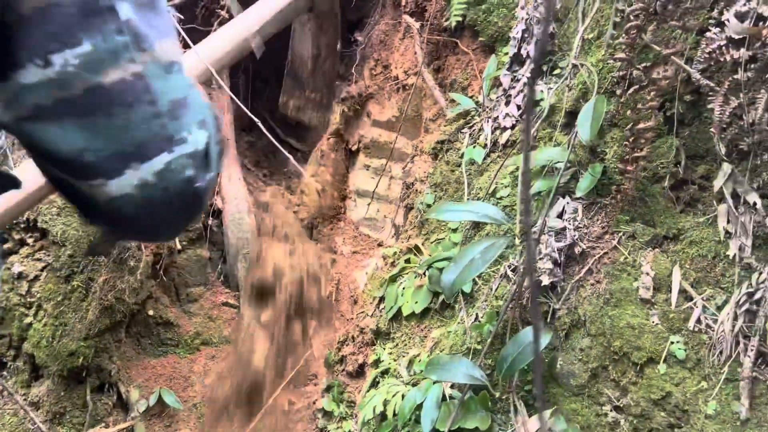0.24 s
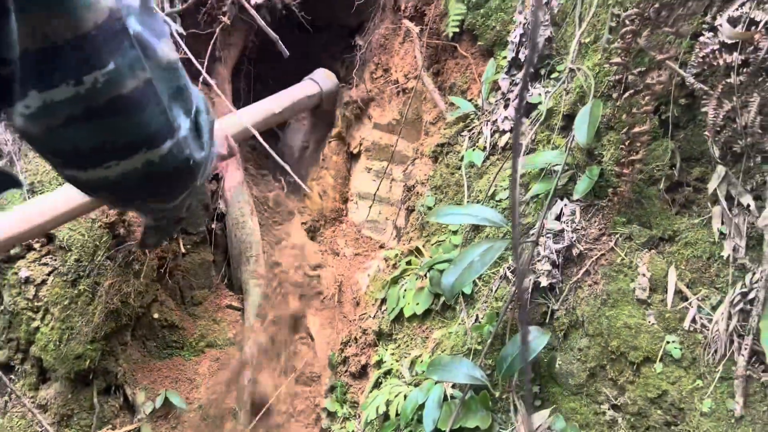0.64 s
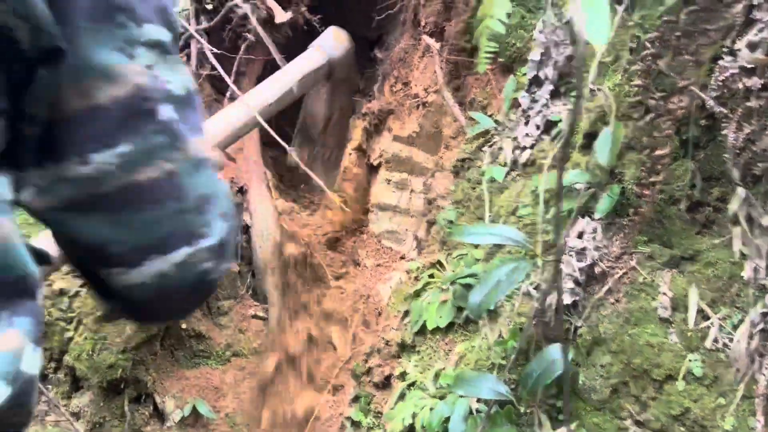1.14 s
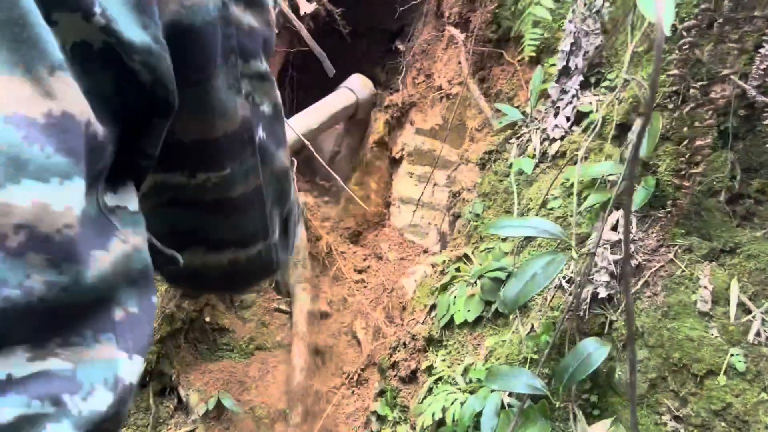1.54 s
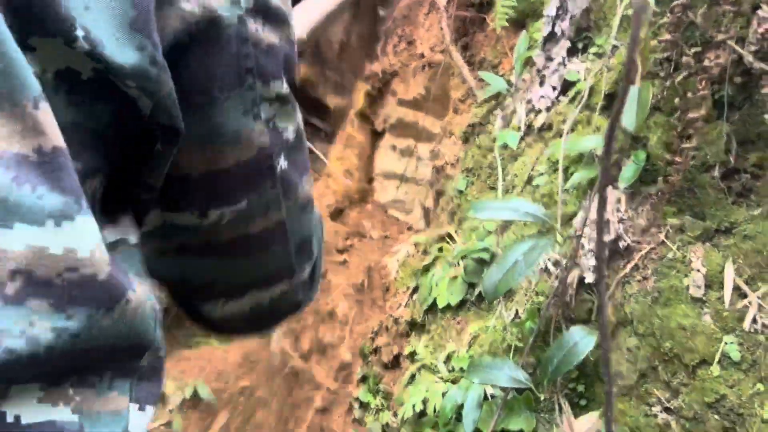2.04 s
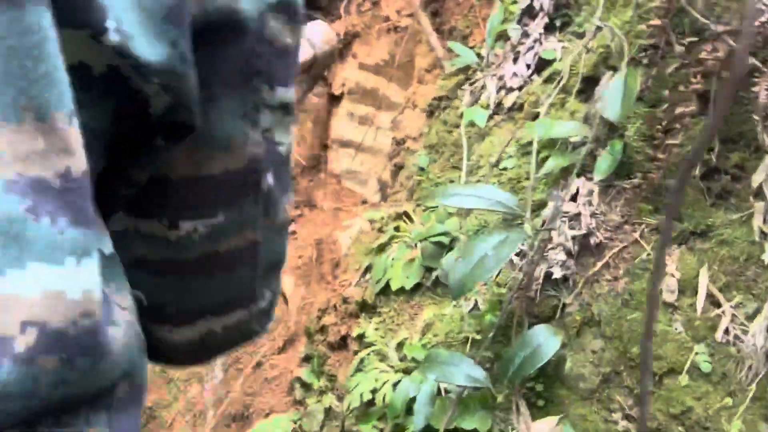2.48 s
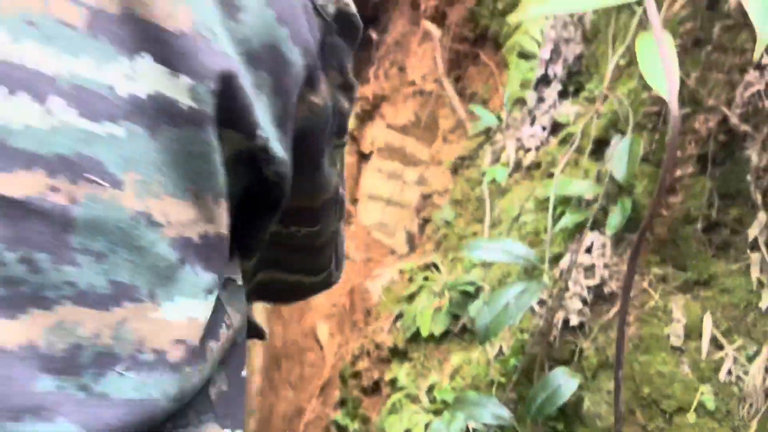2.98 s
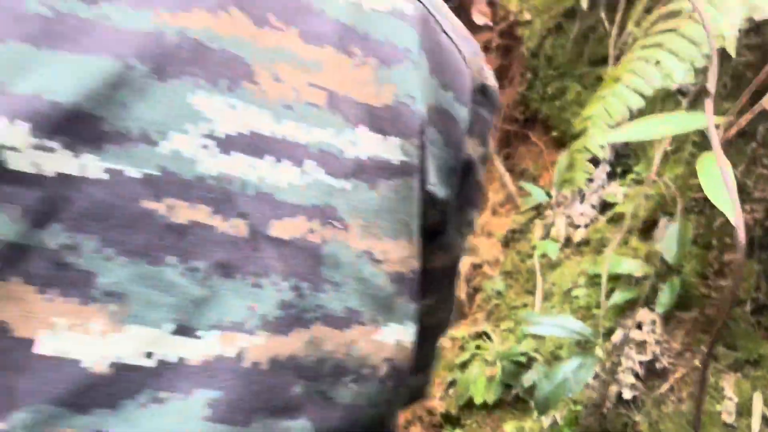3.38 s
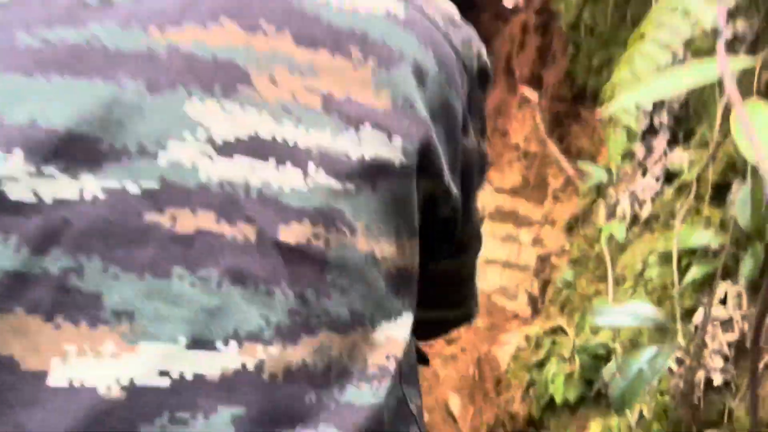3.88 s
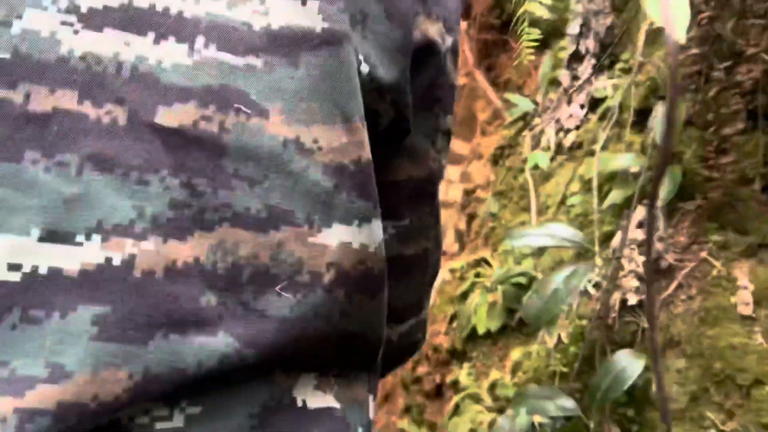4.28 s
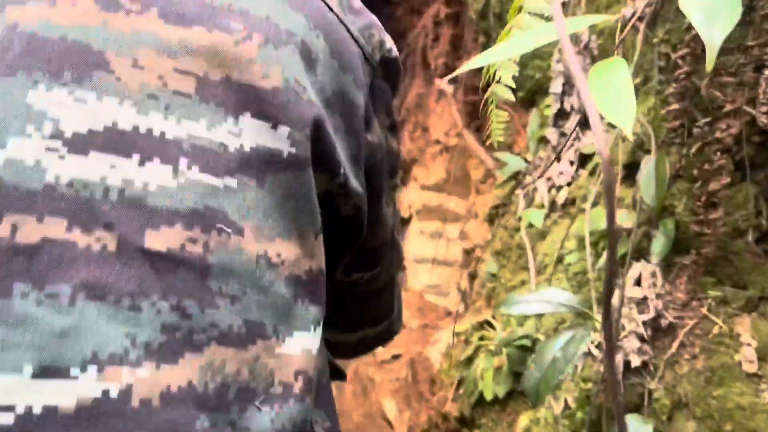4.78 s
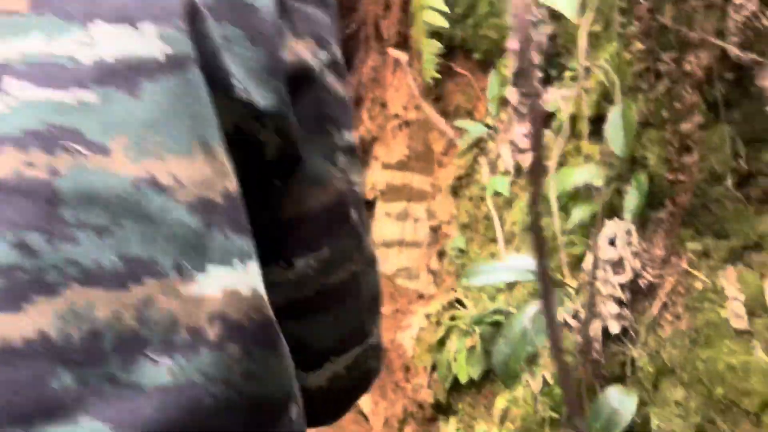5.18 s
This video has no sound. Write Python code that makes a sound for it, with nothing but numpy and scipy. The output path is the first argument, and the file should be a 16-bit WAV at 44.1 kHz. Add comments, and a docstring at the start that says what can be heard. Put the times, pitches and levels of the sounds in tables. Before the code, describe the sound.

A hoe thuds repeatedly into packed hillside soil close by, with gritty blade scrapes, clods knocking down and loose earth trickling after each blow.

```python
"""A sleeve brushes as the arms swing and earth already spills: cloth friction is two layers of grain noise.
Then a hoe chops into a bank of packed earth outdoors, close by: crushed grains, a crack that rings the
blade's modes, and a slap and heave made by sines that fall in pitch. The blade is dragged free with a
gritty rasp and squeaks; clods land as short ringing knocks, crumbs and sand run after them as random grains."""
import sys
import numpy as np
from scipy import signal
from scipy.fft import rfft, irfft
from scipy.io import wavfile

SR = 44100
rng = np.random.default_rng(int(sys.argv[2]) if len(sys.argv) > 2 else 0)


def unload_audio(sound):
    """Save the sound as a 16-bit wav file, at the path given as the first command line argument."""
    columns = np.transpose(np.atleast_2d(sound))
    # keep every value between -1 and 1, then stretch to whole-number steps
    steps = np.round(np.clip(columns, -1, 1) * 32767)
    wavfile.write(sys.argv[1], SR, steps.astype(np.int16))


N = 239188
TIME = np.arange(N) / SR
FREQS = np.fft.rfftfreq(N, 1 / SR)
TINY = 1e-18  # keeps recursive filters out of denormal numbers


def from_db(db):
    """Decibels to gain."""
    return 10 ** (np.asarray(db) / 20)


def rms_one(x):
    """Scale to unit rms."""
    return x / np.sqrt(np.mean(x ** 2) + 1e-20)


def over_hz(points):
    """Read a table on a log-frequency axis."""
    hz, value = np.transpose(points)
    return np.interp(np.log(FREQS + 1), np.log(hz), value)


def coloured(x, spectrum):
    """Give a signal a smooth spectrum."""
    return irfft(rfft(x) * from_db(over_hz(spectrum)), N)


# Likeness of the two channels. Each row: frequency in Hz, correlation [0-1].
LIKENESS = [(60, 1), (140, 0.93), (300, 0.87), (550, 0.49), (800, 0.08), (1400, 0.046), (1900, 0.73),
            (3300, 0.81), (5000, 0.17), (6500, 1), (10000, 1), (12000, 0.94)]


def stereo_noise(spectrum, sizes=1):
    """Random pushes of the given sizes, coloured and partly alike in both channels; rms 1."""
    mid, side = rfft(sizes * rng.standard_normal((2, N)))
    alike = np.clip(over_hz(LIKENESS), 0, 1)
    common = np.sqrt(1 + alike) * mid
    difference = np.sqrt(1 - alike) * side * [[1], [-1]]
    return rms_one(irfft((common + difference) * from_db(over_hz(spectrum)), N))


def grit(spectrum, per_s, spread_db):
    """Grains collide at random moments: many small ones, a few large."""
    born = rng.random(N) < per_s / SR
    sizes = from_db(spread_db * np.minimum(rng.exponential(1, N), 4))
    return stereo_noise(spectrum, born * sizes)


def swell(s, rise, fall, hold=0):
    """A contact builds up to its peak at time s, holds and dies away exponentially."""
    before = (s - TIME) / rise
    after = (TIME - s - hold) / fall
    return np.exp(-np.clip(np.maximum(before, after), 0, 20))


def unevenness(depth_db, hz):
    """A gain that wavers below the given rate, as when earth gives way in fits."""
    slow = signal.sosfilt(signal.butter(2, hz, fs=SR, output="sos"), rng.standard_normal(N))
    return from_db(depth_db * rms_one(slow))


def resonance(x, hz, q):
    """Pass what lies round one pitch."""
    return signal.lfilter(*signal.iirpeak(hz, q, fs=SR), x + TINY)


BITE_Q, BITE_SHARE = 2.57, 0.52  # how narrowly and how strongly a contact favours its own pitch


def bite(force, hz, share=BITE_SHARE):
    """A contact pushes hardest round one pitch, set by the size and hardness of what is hit."""
    return (1 - share) * force + 2 * share * resonance(force, hz, BITE_Q)


def add(track, s, piece):
    """Lay a short sound into a track at time s."""
    start = int(np.clip(round(s * SR), 0, N))
    track[start:start + len(piece)] += piece[:N - start]


def soil_wave(s, first_hz, last_hz, glide, depth_s, fall, growth):
    """Yielding soil pushes the air: quick ripples come first, the slow heave last."""
    t = np.arange(SR // 5) / SR
    hz = last_hz + (first_hz - last_hz) * np.exp(-(t / glide) ** 2)
    level = np.minimum((t / depth_s) ** growth, np.exp((depth_s - t) / fall))
    wave = level * np.sin(2 * np.pi * np.cumsum(hz) / SR)
    return np.concatenate([np.zeros(round(s * SR)), wave, np.zeros(N)])[:N]


# Spectrum of the open air. Each row: frequency in Hz, density in dB per Hz.
AIR = [(20, -21), (60, 16.5), (200, -13), (600, 8), (2000, -55), (6000, -19), (12000, -11.5), (15000, -14)]
AIR_DB = -72.5


def air():
    """Still open air: a faint steady noise."""
    return from_db(AIR_DB) * stereo_noise(AIR)


# Dull bumps. Each row: start in seconds, level in dB, final pitch in Hz.
BUMPS = [(.003, -48.5, 81.3), (0.587, -50, 72), (0.786, -31, 32), (1.764, -40.5, 73), (2.94, -52, 90),
         (4.545, -46, 72.5)]


def bumps():
    """Dull bumps pass through the ground, each falling in pitch."""
    return sum(from_db(db) * soil_wave(s, 1.8 * hz, hz, glide=0.0095, depth_s=0.0069, fall=0.022, growth=0.9)
               for s, db, hz in BUMPS)


# Arm swings. Each row: time of the height in seconds, hiss in dB, flutter in dB,
# time to swell in seconds, time to fade in seconds.
SWINGS = [(.02, -55, -51.5, 0.02, 0.042), (.74, -53, -55.5, 0.14, 0.079), (1.6, -61, -100, 0.19, 0.16),
          (2.0, -63.5, -59, 0.093, 0.016), (2.3, -60, -61.5, 0.62, 1), (3.27, -60.5, -52, 0.055, 0.24),
          (4.1, -103, -50.5, 0.086, 0.18), (4.818, -69.5, -51, 0.23, 0.42)]
# Flutter of the cloth. Each row: frequency in Hz, density in dB per Hz.
CLOTH = [(60, 14.5), (150, -0.5), (310, 8), (500, 2.5), (1400, 2.5), (2300, -8.5), (5300, -7), (8000, -23)]
# Sandy hiss, of cloth and of running sand. Each row: frequency in Hz, density in dB per Hz.
SAND = [(1000, 1.5), (2200, 2), (3200, 2.5), (4300, 1.5), (5500, -1), (7000, -4), (9800, -8), (12000, -7),
        (14000, -15), (16000, -15)]


def sleeve():
    """Cloth brushes on cloth with each swing: a sandy hiss over a dull flutter."""
    hiss, flutter = np.zeros((2, N))
    for s, hiss_db, flutter_db, rise, fall in SWINGS:
        rub = swell(s, rise, fall)
        hiss += from_db(hiss_db) * rub
        flutter += from_db(flutter_db) * rub
    hiss_noise = unevenness(depth_db=2.0, hz=30.2) * grit(SAND, per_s=7000, spread_db=3.0)
    return hiss * hiss_noise + flutter * grit(CLOTH, per_s=2700, spread_db=0.5)


# Small stones and twigs snapping. Each row: start in seconds, level in dB, favoured pitch in Hz.
TICKS = [(0.0771, -27.5, 1420), (0.1242, -43, 1600), (0.1623, -30.5, 3380), (0.3655, -51, 5000),
         (0.7935, -25, 1700), (0.9275, -47, 2500), (0.9727, -29.5, 2700), (1.185, -38, 2600),
         (1.731, -38, 2300), (1.7436, -34.5, 1200), (1.811, -32.5, 1900), (1.837, -35, 1600),
         (1.981, -38, 2000), (2.596, -26.5, 2970), (2.612, -35, 3000), (2.6233, -40, 2500),
         (2.6625, -33, 2500), (2.692, -47, 1200), (2.7345, -34.5, 2110), (2.84, -39, 2920), (3, -46, 1500),
         (3.062, -43.5, 1930), (3.118, -43.5, 1800), (3.39, -36, 1800), (3.409, -29.5, 10100),
         (3.4245, -26.5, 10000), (3.449, -37, 2000), (3.53, -39, 1800), (4.0103, -42, 5960),
         (4.305, -42, 1750), (4.3225, -42, 1750), (4.365, -38, 1700), (4.605, -36.5, 2970),
         (5.195, -30, 3500)]
# Spectrum of a snap. Each row: frequency in Hz, density in dB per Hz.
SNAP = [(400, 17), (1500, 14), (3500, 4.5), (6500, 3), (11000, -5), (15000, -21)]
TICK_RISE_S, TICK_FALL_S = 0.000093, 0.0029


def ticks():
    """Short dry cracks of stones and twigs, each with a colour of its own."""
    snap = stereo_noise(SNAP)
    out = 0
    for s, db, hz in TICKS:
        burst = snap * swell(s + TICK_RISE_S, TICK_RISE_S, TICK_FALL_S)
        out = out + from_db(db) * bite(burst, hz, share=0.65)
    return out


# Modes of the steel blade. Each row: frequency in Hz, width in Hz, level in dB;
# the caller's pitch and damping factors scale frequency and width.
BLADE = [(880, 160, -14.5), (1190, 52, 3.5), (1493, 59, -0.5), (1698, 32, -3.5), (2014, 58, -4),
         (2800, 61, 0.5), (3276, 123, -4), (3910, 110, -10), (4430, 36, -6), (4820, 34, -0.5),
         (5270, 130, -29), (6166, 38, 4), (6840, 110, -3.5), (9770, 94, -2), (11730, 77, -17)]


def blade(force, damping=1, pitch=1):
    """The blade rings in its modes; soil around it damps them."""
    out = 0
    for k, (hz, width_hz, db) in enumerate(BLADE):
        r = np.exp(-np.pi * damping * width_hz / SR)
        poles = [1, -2 * r * np.cos(2 * np.pi * pitch * hz / SR), r * r]
        mode = signal.lfilter([1, 0, -1], poles, force + TINY)
        out = out + (-1) ** k * from_db(db) * (1 - r * r) / 2 * mode
    return out


# Loosened earth spilling down the slope. Each row: time of the height in seconds, ground rumble in dB,
# crumbs in dB, sand in dB, run-out time of the crumbs in seconds.
SPILLS = [(0.142, -70, -51.5, -59, 0.11), (.24, -54.5, -64, -63.5, 0.074), (0.929, -61, -51, -55, 0.16),
          (1.79, -54.5, -48.5, -56, 0.1), (2.614, -63, -46, -54.5, 0.086), (2.91, -55.5, -57, -87, 0.19),
          (3.441, -49.5, -46, -58, 0.11), (3.92, -52.5, -61.5, -70, 0.043),
          (4.253, -43.5, -44.5, -52, 0.077), (4.367, -39.5, -45.5, -81, 0.024),
          (4.478, -42, -57, -63, 0.046), (5.23, -54, -47, -56, 0.059), (5.38, -55, -49, -59, 0.099)]
SPILL_RISE_S = 0.065
RUMBLE_REST_DB, CRUMBS_REST_DB, SAND_REST_DB = -69.5, -78.5, -86  # the slope never quite settles
RUMBLE_LINGERS, SAND_LINGERS = 1.26, 0.97  # run-out time relative to the crumbs


def spill_flow():
    """Each spill gathers and runs out: strengths of its rumble, crumbs and sand, summed as power."""
    rest = from_db([RUMBLE_REST_DB, CRUMBS_REST_DB, SAND_REST_DB])
    power = np.outer(rest ** 2, np.ones(N))
    for s, *levels_db, fall in SPILLS:
        for k, lingers in enumerate((RUMBLE_LINGERS, 1, SAND_LINGERS)):
            power[k] += (from_db(levels_db[k]) * swell(s, SPILL_RISE_S, lingers * fall)) ** 2
    return np.sqrt(power)


def pebbles(level, low_hz, high_hz, per_s, cycles, count=28):
    """Hard crumbs bounce at random, each ringing briefly at a pitch picked at random."""
    born = rng.random(N) < per_s / SR
    sizes = from_db(1.4 * np.minimum(rng.exponential(1, N), 3))
    hits = born * sizes * rng.choice([-1, 1], N)
    dealt = rng.integers(0, count, N)
    out = 0
    for k, hz in enumerate(np.geomspace(low_hz, high_hz, count)):
        r = from_db(-60 * hz / (cycles * SR))  # down 60 dB after the given cycles
        w = 2 * np.pi * hz / SR
        ping = signal.lfilter([0, np.sin(w)], [1, -2 * r * np.cos(w), r * r], hits * (dealt == k) + TINY)
        out = out + ping * from_db(rng.normal(0, 1.0, (2, 1)))
    return level * rms_one(out)


# Rumble of the ground. Each row: frequency in Hz, density in dB per Hz.
RUMBLE = [(20, -28), (45, 4.5), (80, 5.5), (150, 2), (260, -9.5), (500, -19.5), (1200, -66)]
# Patter of crumbs. Each row: frequency in Hz, density in dB per Hz.
CRUMBS = [(120, 22), (300, 19.5), (550, 15.5), (900, -4), (1400, 11.5), (2000, 10), (3000, -18),
          (6000, -64)]


def sliding_earth(rumble, crumbs, sand):
    """Crumbs patter and sand hisses down the slope and over the blade, in small clusters."""
    fits = unevenness(depth_db=2.8, hz=90)
    ground = rumble * grit(RUMBLE, per_s=360, spread_db=3.5)
    patter = crumbs * grit(CRUMBS, per_s=1100, spread_db=3.0)
    patter = patter + pebbles(from_db(-3.5) * crumbs, 378, 2830, per_s=700, cycles=12.0)
    trickle = from_db(1.5) * sand * grit(SAND, per_s=3000, spread_db=1.5)
    ring = from_db(13) * blade(sand * stereo_noise(SAND))
    return ground + fits * (patter + trickle + ring)


# Coarse grit, dragged or bouncing. Each row: frequency in Hz, density in dB per Hz.
COARSE = [(200, 5), (600, -1), (1000, -2), (1400, -1), (2050, -3.5), (2700, -8.5), (4500, -16), (7000, -45),
          (15000, -37)]
CHIPS_PER_S, CHIP_FALL_S = 65, 0.0043
CHIP_DB = 7.5  # gain over the crumbs' strength
CHIP_SPREAD_DB = 14  # between the largest and the smallest


def chips(flow):
    """Hard chips bounce at random in a spill, each a short gritty click at one of three pitches."""
    out = 0
    for hz in np.geomspace(1100, 4200, 3):
        born = rng.random(N) < CHIPS_PER_S / (3 * SR)
        hits = born * from_db(-CHIP_SPREAD_DB * rng.random(N))
        clicks = signal.lfilter([1], [1, -np.exp(-1 / (CHIP_FALL_S * SR))], hits + TINY)
        out = out + bite(clicks * stereo_noise(COARSE), hz)
    return from_db(CHIP_DB) * flow * out


# Blade dragged over grit. Each row: start in seconds, length in seconds, level in dB,
# share of fine sharp grains [0-1], blade drive over the rasp in dB, pitch of the bite in Hz.
SCRAPES = [(0.155, 0.013, -43.5, 0.52, -3, 3300), (0.8036, 0.014, -33, 0.53, 11.5, 3400),
           (0.827, 0.0036, -34, 0.58, 10, 3970), (0.902, 0.005, -38.5, 0, 9.5, 2200),
           (0.933, 0.006, -42.5, 0.02, 8, 2680), (1.096, .014, -48.5, 0.36, 5, 1900),
           (1.734, 0.016, -42.5, 0.48, 11, 2400), (2.592, 0.0032, -34.5, 0.53, 10.5, 2870),
           (2.61, 0.01, -37.5, 0.7, 8, 2800), (2.886, 0.029, -49, 0.85, 12.5, 1560),
           (3.372, 0.047, -50.5, 0.6, 15.5, 6070), (3.444, 0.017, -51, 0.43, 18, 2050),
           (3.525, 0.026, -50, 0.7, 12.5, 2020), (3.605, 0.08, -52.5, 0.36, -1, 1970),
           (3.905, 0.0065, -48.5, 0.68, 12.5, 1920), (4.108, 0.0024, -40.5, 0.28, 19.5, 2120),
           (4.114, 0.0049, -35.5, 0.73, -3, 1900), (4.153, 0.029, -41.5, 0.53, 4, 3200),
           (4.245, 0.0075, -33, 0.45, 4, 2660), (4.333, 0.013, -41.5, 0.23, 9.5, 1880),
           (5.112, 0.0045, -50.5, 0.76, 18, 3950), (5.147, 0.0093, -47, 0.15, 12, 3040),
           (5.1952, 0.014, -34, 0.53, 15.5, 1910), (5.227, 0.0073, -38, 0.65, 12, 3450),
           (5.268, 0.011, -37.5, 0.4, 8, 1980)]
# Fine sharp grit. Each row: frequency in Hz, density in dB per Hz.
FINE = [(500, 4), (1500, 0), (3000, -0.5), (4500, -0.5), (6500, -4.5), (8500, -8), (11000, -16),
        (15000, -19)]
SCRAPE_RISE_S, SCRAPE_FALL_S = 0.0015, 0.0073


def scrapes():
    """Grit catches on the blade in fits as it is levered and drawn out; clear of the soil, the steel rings on."""
    coarse = grit(COARSE, per_s=6700, spread_db=3.5)
    fine = grit(FINE, per_s=8000, spread_db=3.5)
    fits = unevenness(depth_db=1.5, hz=206)
    rasp, drive = np.zeros((2, 2, N))
    for s, length, db, share, ring_db, bite_hz in SCRAPES:
        pressure = from_db(db) * fits * swell(s, SCRAPE_RISE_S, SCRAPE_FALL_S, hold=length)
        stroke = pressure * ((1 - share) * coarse + share * fine)
        rasp += stroke
        drive += from_db(ring_db) * bite(stroke, bite_hz)
    return rasp + blade(drive, damping=0.78)


# A lump and the ground it lands on. Each row: ratio to the lump's pitch, level in dB.
LUMP_MODES = [(.58, -8.5), (.95, 1.5), (1.4, -10)]
LUMP_DECAY_CYCLES, LUMP_BUILD_UP_CYCLES, LUMP_SCATTER_OCTAVES = 1.53, .6, .05
TOUCH_DB, TOUCH_FALL_S = -13.5, 0.0015
TOUCH_BRIGHTNESS = 1.8  # top of the touch as a multiple of the lump's pitch


def knock(hz):
    """A dry landing: a gritty touch, then lump and ground ring for a cycle or two, never twice alike."""
    t = np.arange(SR // 20) / SR
    body = 0
    for ratio, db in LUMP_MODES:
        pitch = hz * ratio * 2 ** rng.normal(0, LUMP_SCATTER_OCTAVES)
        body = body + from_db(db) * np.exp(-t * pitch / LUMP_DECAY_CYCLES) * np.sin(2 * np.pi * pitch * t)
    body = body * (1 - np.exp(-t * hz / LUMP_BUILD_UP_CYCLES))
    dull = signal.butter(2, min(TOUCH_BRIGHTNESS * hz, SR / 4), fs=SR, output="sos")
    touch = rms_one(signal.sosfilt(dull, rng.standard_normal(len(t)))) * np.exp(-t / TOUCH_FALL_S)
    return body + from_db(TOUCH_DB) * touch


LUMPS_PER_S = 81  # at full flow
LUMP_DB = -1.5  # largest lump, over the crumbs' strength
LUMP_HZ, LUMP_SPREAD_OCTAVES = 450, 0.8  # middle pitch, spread either way


def small_lumps(flow, count=900):
    """Lumps land at random, harder and more often where more earth runs: rows of (s, dB, Hz)."""
    wait, size, pitch, luck = rng.random((count, 4)).T
    s = np.cumsum(2 * wait / LUMPS_PER_S)
    strength = np.interp(s, TIME, flow)
    db = 20 * np.log10(strength) + LUMP_DB - 6 * size
    hz = LUMP_HZ * 2 ** (LUMP_SPREAD_OCTAVES * (2 * pitch - 1))
    lands = (s < TIME[-1]) & (luck < np.sqrt(strength / flow.max()))
    return np.transpose([s, db, hz])[lands]


# The biggest clods landing. Each row: start in seconds, relative level in dB, pitch in Hz,
# time to break up in seconds.
CLODS = [(.1625, -30.5, 555, 0.0051), (.174, -36.5, 375, 0.0057), (.21, -44, 393, 0.0056),
         (.568, -41, 436, 0.011), (.579, -43.5, 302, 0.0082), (0.821, -25, 120, 0.0049),
         (.906, -38, 457, .006), (0.938, -37, 380, .008), (.973, -30, 610, 0.0043),
         (1.356, -50, 304, 0.006), (1.743, -39, 690, 0.0065), (1.76, -35, 194, 0.0088),
         (1.81, -38.5, 515, 0.0074), (1.838, -38.5, 630, 0.0038), (2.202, -48, 400, 0.011),
         (2.246, -42.5, 494, 0.013), (2.411, -41, 670, 0.0079), (2.611, -28, 462, 0.0054),
         (2.623, -45, 450, .005), (2.662, -43, 420, 0.011), (2.6911, -33.5, 400, 0.0032),
         (2.735, -42.5, 420, 0.011), (2.799, -44, 388, 0.011), (2.933, -42.5, 258, 0.0051),
         (3.067, -46, 308, 0.066), (3.39, -38, 400, 0.012), (3.447, -39, 495, 0.01), (3.53, -43, 442, .014),
         (3.846, -45.5, 493, 0.018), (3.909, -39.5, 425, 0.019), (3.918, -40, 187, 0.0053),
         (3.952, -41, 558, 0.0038), (4.039, -36, 158, 0.0055), (4.115, -28.5, 225, 0.0042),
         (4.302, -31, 654, 0.0067), (4.3215, -32.5, 637, 0.0075), (4.356, -25.5, 444, 0.019),
         (4.3635, -28, 635, 0.0098), (4.3745, -28.5, 477, 0.0068), (4.386, -42, 597, 0.01),
         (4.417, -32, 590, 0.015), (4.424, -37, 380, 0.018), (4.45, -36.5, 597, 0.016),
         (4.481, -33.5, 633, 0.01), (5.127, -32, 230, 0.0036), (5.213, -27, 202, 0.0045),
         (5.28, -39.5, 400, .012), (5.354, -35.5, 259, 0.0036)]
FRAGMENT_DB, FRAGMENT_LOSS_DB = -4.5, 4  # level against the clod, loss per break-up time


def fragments(count=4):
    """Each big clod sheds pieces that land unevenly after it, ever more weakly: rows of (s, dB, Hz)."""
    rows = []
    for s, db, hz, breakup_s in CLODS:
        after = np.cumsum(rng.uniform(0.15, 0.75, count))
        piece_db = db + FRAGMENT_DB - FRAGMENT_LOSS_DB * after
        rows += zip(s + after * breakup_s, piece_db, hz * 2 ** rng.uniform(-0.53, 0.62, count))
    return rows


# A lump breaking up as it lands. Each row: frequency in Hz, density in dB per Hz.
CRUMBLE = [(100, -23), (280, 8), (450, 3), (700, 9), (1050, -8), (1750, -1.5), (2400, -33), (5000, -35),
           (12000, -70)]


def clods(flow):
    """Lumps land with dry knocks; the big ones break up into a tumble of pieces and crumbs."""
    pats = np.zeros(N)
    for s, db, hz, *_ in [*CLODS, *fragments(), *small_lumps(flow)]:
        add(pats, s + 0.000985, from_db(db) * knock(hz))
    pieces = grit(CRUMBLE, per_s=1800, spread_db=1.5)
    crumble = 0
    for s, db, hz, breakup_s in CLODS:
        burst = pieces * swell(s + 0.0018, rise=0.00095, fall=breakup_s)
        crumble = crumble + from_db(db) * bite(burst, hz)
    return from_db(3.0) * pats + from_db(-5.0) * crumble


# Modes of the wooden handle. Each row: frequency in Hz, width in Hz, level in dB.
HANDLE = [(305, 41, 0), (400, 19.4, 1.5), (528, 28, 0), (695, 83, 4), (924, 26, -10)]


def handle(knocks):
    """The wooden handle knocks in its bending modes."""
    out = 0
    for k, (hz, width_hz, db) in enumerate(HANDLE):
        r, w = np.exp(-np.pi * width_hz / SR), 2 * np.pi * hz / SR
        mode = signal.lfilter([0, np.sin(w)], [1, -2 * r * np.cos(w), r * r], knocks + TINY)
        out = out + (-1) ** k * from_db(db) * mode
    return out


# Blows. Each row: start in seconds, slap in dB, first slap pitch in Hz, time to the slap's peak in seconds,
# heave in dB, final heave pitch in Hz, time to full depth in seconds, crunch in dB,
# head start of the crunch in seconds, crunch length in seconds, crack in dB, delay of the crack in seconds,
# relative blade strike in dB, pitch of the bite in Hz, relative handle knock in dB.
BLOWS = [(0.7642, -15.5, 487, 0.0064, -12.5, 98.4, 0.017, -28.5, 0.0055, 0.0084, -14.5, 0.0037, -30, 1880, -31),
         (1.631, -26, 565, 0.0078, -26, 95.7, 0.026, -28, 0.0011, 0.006, -28, 0.0021, -21.5, 1120, -30),
         (2.486, -19.5, 570, 0.0067, -18.5, 144, 0.012, -32.5, .0012, 0.0093, -30, 0.00047, -29, 1410, -22),
         (3.264, -23.5, 554, 0.0055, -17.5, 198, 0.013, -32.5, .0003, 0.0064, -27, .0018, -14, 1510, -24),
         (4.115, -26.5, 304.5, 0.0167, -23.5, 98, 0.024, -36, 0.0009, 0.0048, -30, 0.00139, -32, 2100, -68),
         (4.252, -24, 272, 0.0089, -23, 65.6, 0.03, -52, .001, 0.015, -44, 0.0016, -32, 2580, -60),
         (4.972, -14, 435, 0.006, -8.5, 105.6, 0.015, -29.5, 0.00074, 0.0034, -18.5, 0.0027, -32, 2400, -23.5)]
# Grains crushed at the edge. Each row: frequency in Hz, density in dB per Hz.
CRUNCH = [(150, 1), (400, -2), (800, 6), (1300, 1.5), (2500, -4.5), (4000, -12.5), (7000, -15.5),
          (11000, -22.5), (15000, -31)]
# The edge cracking into packed earth. Each row: frequency in Hz, density in dB per Hz.
CRACK = [(200, -8), (750, 14.5), (1400, -6.5), (2300, -2.5), (3800, -10.5), (6000, -9), (9000, -15.5),
         (15000, -32)]
CRUNCH_RISE_S, CRUNCH_FALL_S = .0007, 0.0053
CRACK_RISE_S, CRACK_FALL_S = .0002, 0.0013
BURIED_PITCH, BURIED_DAMPING = 1.02, 1.4  # the grip of the soil raises and widens the blade's modes
SWAY_HZ = 74.1  # of the bank, for a heave of 100 Hz


def chops():
    """Each blow crushes grains, cracks, rings blade and handle, slaps, then heaves and shudders the bank."""
    slap, thud, crush, jolt, edge, knocks, shudder = np.zeros((7, N))
    for (s, slap_db, slap_hz, slap_s, heave_db, heave_hz, depth_s, crunch_db, lead, length,
         crack_db, delay, ring_db, bite_hz, knock_db) in BLOWS:
        slap += from_db(slap_db) * soil_wave(
            s, slap_hz, 0.269 * slap_hz, 1.77 * slap_s, slap_s, fall=0.0062, growth=0.96)
        thud += from_db(heave_db) * soil_wave(
            s, 1.5 * heave_hz, heave_hz, depth_s, depth_s, fall=.008, growth=2)
        # the loosened mass of the bank sways too, and dies away later
        sway_hz = SWAY_HZ * (heave_hz / 100) ** 0.42
        thud += from_db(heave_db - 11.5) * soil_wave(
            s, 1.41 * sway_hz, sway_hz, depth_s, depth_s, fall=0.019, growth=0.97)
        crush += from_db(crunch_db) * swell(s - lead, CRUNCH_RISE_S, CRUNCH_FALL_S, hold=length)
        # the edge meets packed earth and stops short
        jolt += from_db(crack_db) * swell(s + delay, CRACK_RISE_S, CRACK_FALL_S)
        strike = signal.unit_impulse(N, round((s + delay) * SR))
        edge += from_db(ring_db) * bite(strike, bite_hz)
        knocks += from_db(knock_db) * strike
        shudder += from_db(heave_db) * swell(s + depth_s, rise=0.0017, fall=0.034)
    crunch = crush * grit(CRUNCH, per_s=14000, spread_db=4.0)
    crack = jolt * stereo_noise(CRACK)
    # the soil cushions the edge, so the lower modes take most of the blow
    cushioned = signal.sosfilt(signal.butter(2, 3200, fs=SR, output="sos"), edge + TINY)
    drive = from_db(32) * cushioned + from_db(-4.5) * crunch
    steel = blade(drive, damping=BURIED_DAMPING, pitch=BURIED_PITCH)
    bank = from_db(-22.0) * shudder * stereo_noise(RUMBLE)
    # the edge catches and slips on its way in
    jerks = unevenness(depth_db=2.2, hz=600)
    return slap * jerks + thud + crunch + crack + steel + from_db(-8) * handle(knocks) + bank


# Blade squeaking on a stone. Each row: start in seconds, length in seconds, level in dB, pitch in Hz.
SQUEAKS = [(.794, .003, -37.5, 3930), (0.803, .004, -36, 1920), (0.807, .007, -38, 3150),
           (0.8144, 0.0039, -30, 2090), (.827, .003, -35, 1930), (.828, .003, -43, 5250),
           (1.085, .004, -54.5, 3250), (3.907, 0.0088, -52.5, 1970), (5.113, 0.0042, -48, 3820),
           (5.158, .012, -58, 4800), (5.198, 0.0094, -36, 2050), (5.228, 0.027, -53, 3300)]
SQUEAK_Q, SQUEAK_FALL_S = 11.3, 0.0064


def squeaks():
    """Where the blade sticks and slips on a stone, the rubbing gathers round one pitch."""
    rub = stereo_noise(FINE)
    out = 0
    for s, length, db, hz in SQUEAKS:
        tone = rms_one(resonance(resonance(rub, hz, SQUEAK_Q), hz, SQUEAK_Q))
        out = out + from_db(db) * swell(s, SCRAPE_RISE_S, SQUEAK_FALL_S, hold=length) * tone
    return out


def scene():
    """All the sources in still open air."""
    rumble, crumbs, sand = spill_flow()
    earth = bumps() + ticks() + sliding_earth(rumble, crumbs, sand) + chips(crumbs) + clods(crumbs)
    return air() + sleeve() + earth + scrapes() + chops() + squeaks()


# Phase between the ports. Each row: frequency in Hz, lead of the left port in radians.
PORT_PHASE = [(0, 0), (720, -.5), (900, .4), (1220, .7), (1400, -2.3), (1560, -3.3), (1760, -5.9),
              (2900, -5.3), (4900, -5.8), (5500, -7.1), (7400, -8.3), (8400, -9.45), (9400, -10.3),
              (11200, -12.4), (13600, -12.7), (14400, -15.2)]
# Balance of the ports. Each row: frequency in Hz, excess of the left port in dB.
PORT_BALANCE = [(130, 1.7), (270, 0.5), (1000, 1), (2000, -0.4), (4000, 3.4), (11000, -0.7)]
# Colour of the housing. Each row: frequency in Hz, gain in dB.
MIC_COLOUR = [(18, -20), (30, -29), (50, 1.5), (230, 1.5), (305, 3), (400, -0.5), (560, -0.5), (780, -1),
              (1000, -1), (7000, 0.5), (9000, 8), (12000, 4.5), (15500, -5.5)]
CUTOFF_HZ = 15500


def record(dry):
    """Two microphone ports differ in phase and level; the housing colours the sound; the top is cut."""
    lead = np.interp(FREQS, *np.transpose(PORT_PHASE))
    turn = np.exp(-1j * lead * np.array([[0], [1]]))  # only the right port is turned
    balance = from_db(over_hz(PORT_BALANCE) * np.array([[1], [-1]]) / 2)
    ports = irfft(rfft(dry) * turn * balance, N)
    top_cut = signal.ellip(10, .1, 80, CUTOFF_HZ, fs=SR, output="sos")
    return signal.sosfilt(top_cut, coloured(ports, MIC_COLOUR))


dry = scene()
out = record(dry)
unload_audio(out)
```